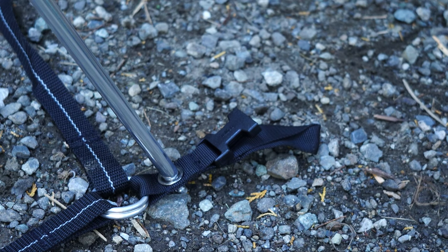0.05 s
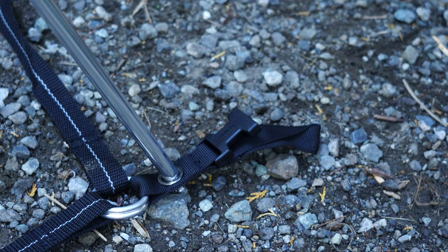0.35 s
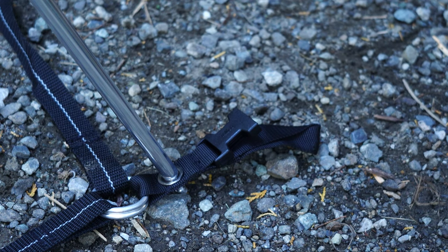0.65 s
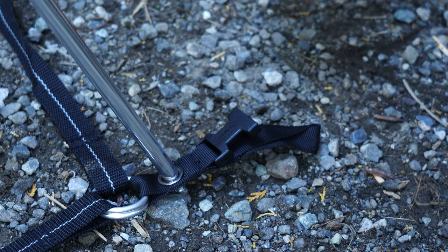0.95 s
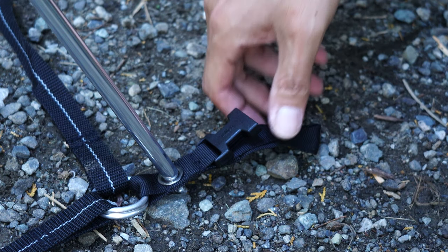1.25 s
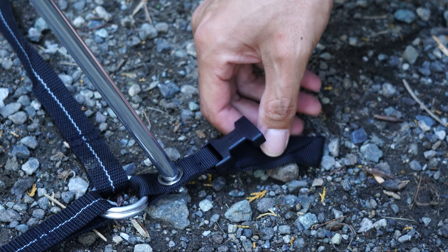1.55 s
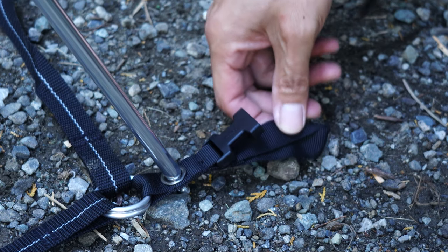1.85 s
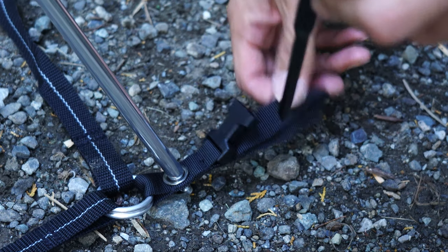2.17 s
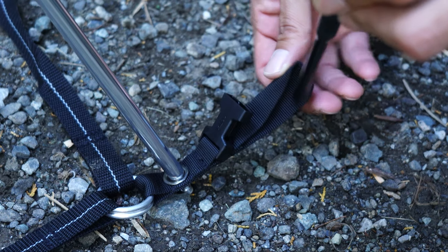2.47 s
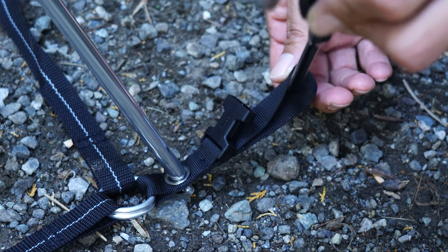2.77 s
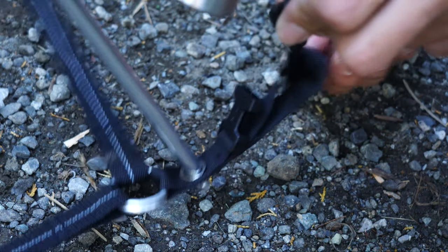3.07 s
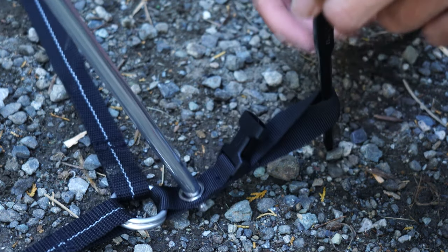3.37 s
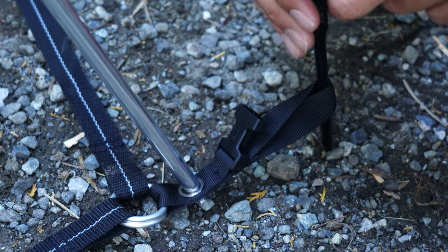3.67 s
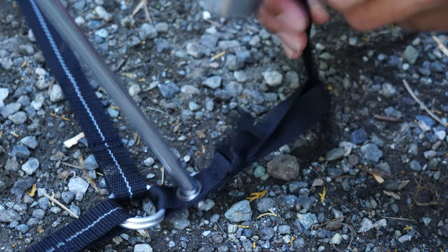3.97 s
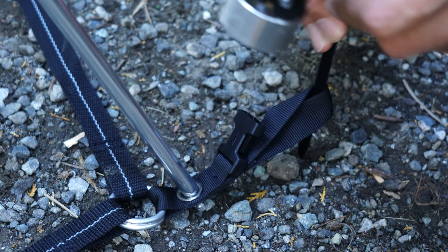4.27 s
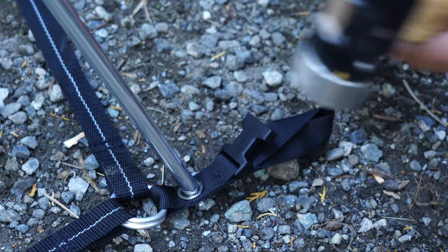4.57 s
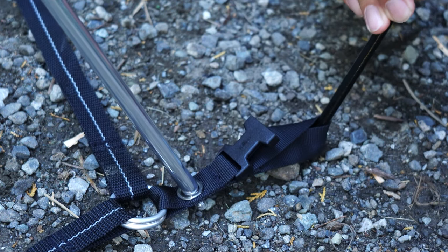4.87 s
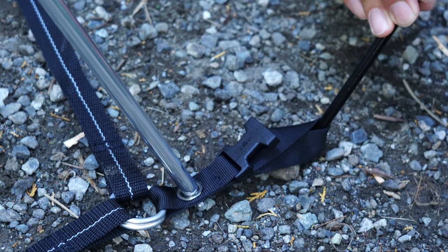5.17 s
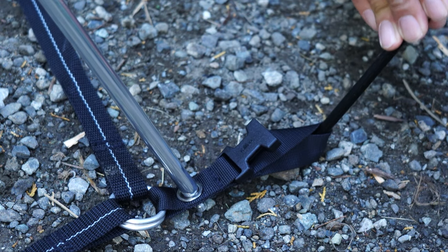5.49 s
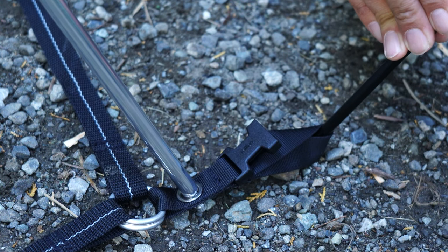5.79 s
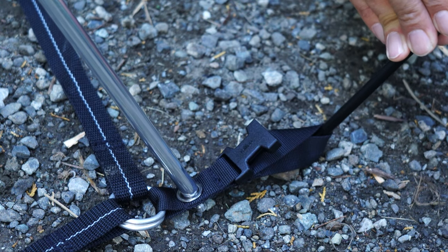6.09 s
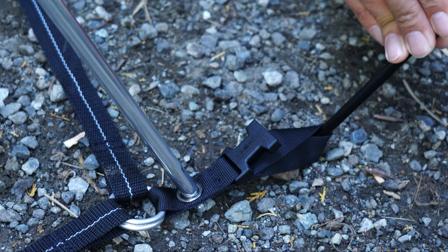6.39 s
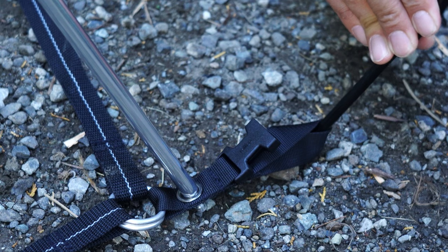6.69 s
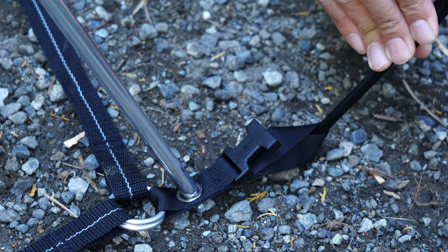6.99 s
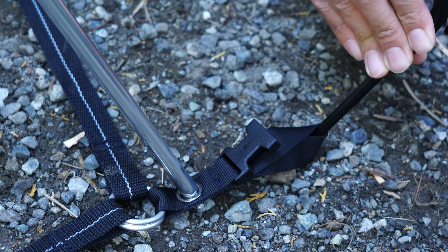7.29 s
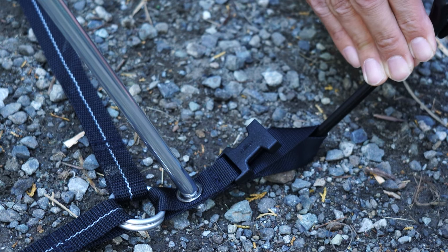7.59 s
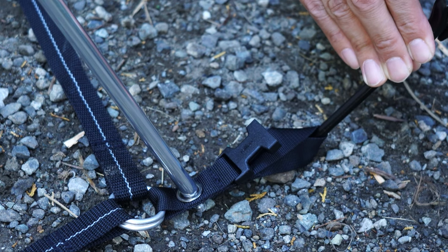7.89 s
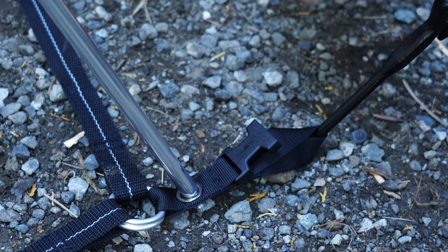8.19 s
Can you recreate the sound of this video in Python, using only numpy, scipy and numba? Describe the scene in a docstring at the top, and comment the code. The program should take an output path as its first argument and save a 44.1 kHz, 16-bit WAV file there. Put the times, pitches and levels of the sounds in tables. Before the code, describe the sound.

Close by at a quiet campsite, a shoe scuffs gravel and loose steel tent stakes slide together with a loud, ringing clank. Sleeves and nylon rustle softly, with small stone knocks, clicks of metal fittings and thin ticks from a tightening strap. After a short gravel crunch, a hammer strikes a stake about seven times, sharp and evenly spaced, with a light outdoor echo. A distant engine hums faintly throughout.

```python
"""A gravel campsite, close to a tent being pitched. Nylon and sleeves rub, loose steel stakes scrape
and ring in their free modes, a shoe grinds the stones, fittings click and webbing ticks by stick-slip
friction. Then a hammer drives a stake in, each impact exciting the modes of stake and hammer head.
The surroundings reflect the work, a far engine hums at its firing rate, and a limiter ducks the
loudest peaks."""
import sys
import numpy as np
from scipy import signal
from scipy.fft import rfft, irfft, next_fast_len
from scipy.io import wavfile
from scipy.ndimage import uniform_filter1d, minimum_filter1d
from numba import njit

SR = 44100
rng = np.random.default_rng(int(sys.argv[2]) if len(sys.argv) > 2 else 0)


def bounce(signal):
    """Save signal as a 16-bit WAV file at the path given by the first command-line argument."""
    frames = np.transpose(np.atleast_2d(signal))
    limited = np.clip(frames, -1, 1)
    pcm = np.round(limited * 32767).astype(np.int16)
    wavfile.write(sys.argv[1], SR, pcm)


N = 372644
TIME = np.arange(N) / SR


def undb(db):
    """Decibels to amplitude ratio."""
    return 10 ** (np.asarray(db) / 20)

def unit(x):
    """Normalisation to rms 1."""
    return x / np.sqrt(np.mean(x ** 2))

def fade(t, t60):
    """Exponential decay by 60 dB in t60 seconds."""
    return np.exp(-np.log(1000) * t / t60)

def mode(t, hz, t60, db):
    """Free vibration of one mode: a damped sinusoid."""
    return undb(db) * np.sin(2 * np.pi * hz * t) * fade(t, t60)

def add(out, s, x):
    """Superposition of x on out at time s, which may lie before the start."""
    i = int(s * SR)
    part = x[..., max(-i, 0):N - i]
    out[..., max(i, 0):max(i, 0) + part.shape[-1]] += part

def colour(x, points):
    """Spectral shaping by (frequency [Hz], gain [dB]) points, conserving the power of white noise."""
    hz, db = np.transpose(points)
    f = np.fft.rfftfreq(x.shape[-1], 1 / SR)
    gain = unit(undb(np.interp(np.log(f + 1), np.log(hz), db)))
    return irfft(rfft(x) * gain, x.shape[-1])

def noise(points):
    """Coloured Gaussian noise, rms near 1."""
    return colour(rng.standard_normal(next_fast_len(N)), points)[:N]

def resonance(x, hz, width):
    """Two-pole resonator, gain 1 at the centre."""
    return signal.lfilter(*signal.iirpeak(hz, hz / width, fs=SR), x)

def walk(rate):
    """Smooth random modulation, spread near 1."""
    k = int(SR / rate)
    return uniform_filter1d(np.repeat(rng.standard_normal(N // k + 1), k), k)[:N]

def grit(size, spread_db):
    """Dense micro-contacts of log-normal strength, rms 1."""
    return unit(rng.standard_normal(size) * undb(spread_db * rng.standard_normal(size)))

def sides(pan_db):
    """Constant-power panning; pan is the left level minus the right."""
    return unit(undb(np.array([[pan_db], [-pan_db]]) / 2))

def place(x, pan_db, scatter=0.44, size=200):
    """Multipath propagation: each channel gets the direct sound and scatter from hands and stones."""
    paths = rng.standard_normal((2, size)) * fade(TIME[:size], 0.032)
    paths *= scatter / np.linalg.norm(paths, axis=1, keepdims=True)
    paths[:, 0] = 1
    arrivals = signal.oaconvolve(x[None], paths, axes=1)[:, :len(x)]
    return arrivals * sides(pan_db) / np.hypot(1, scatter)


def friction(points, spread_db, pan_db, diffuse):
    """An extended rubbing surface radiates grainy noise, only partly coherent between the channels."""
    shared, left, right = (colour(grit(next_fast_len(N), spread_db), points)[:N] for _ in range(3))
    return (shared + diffuse * np.array([left, right])) * sides(pan_db) / np.hypot(1, diffuse)

def stroke(length, attack_share=0.37, release_share=0.22):
    """Amplitude envelope of a cloth movement: it speeds up, holds and dies away."""
    release = release_share * length
    t = TIME[:int((length + 6 * release) * SR)]
    rise = np.sin(np.pi / 2 * np.minimum(t / (attack_share * length), 1)) ** 2
    return rise * np.exp(-np.maximum(t - length, 0) / release)

# spectra of rubbing cloth and of hissing nylon weave: (frequency [Hz], gain [dB])
RUB_SPECTRUM = [(100, -34), (280, -5.5), (550, -0.5), (1200, -2.5), (2100, -1), (3500, -5.5), (6000, -13),
                (12000, -70)]
HISS_SPECTRUM = [(1000, -24), (3000, 0), (5000, -0.5), (8000, -0.5), (11000, -1), (15500, -0.5)]
# strokes of sleeves and nylon: (time [s], duration [s], relative rub [dB], relative hiss [dB])
CLOTH_STROKES = [(-0.2, 0.82, -36.5, -34.5), (0.615, 0.28, -35.5, -30), (0.924, 0.27, -41, -41),
                 (1.215, 0.15, -62, -44), (1.727, 0.37, -36, -35.5), (2.11, 0.21, -44, -43),
                 (2.404, 0.25, -42.5, -46), (2.857, 0.2, -49, -71), (3.015, .11, -60, -44),
                 (3.25, 0.21, -40.5, -37), (3.553, 0.11, -46.5, -42.5), (4.466, 0.17, -44, -41),
                 (4.592, 0.26, -34, -34), (4.899, 0.099, -43, -41), (5.013, 0.17, -38, -43.5),
                 (5.139, 0.04, -33.5, -33), (5.2, 0.23, -43, -38), (5.455, 0.17, -39.5, -43.5),
                 (5.743, 0.15, -45, -45), (6.66, 0.21, -50.5, -47), (7.981, 0.14, -38, -39.5),
                 (8.119, 0.13, -41, -38), (8.237, 0.11, -37, -33.5)]

def fabric(swing_s=0.074):
    """Friction noise: cloth murmurs and nylon hisses; incoherent strokes add in power."""
    # the sleeve swishes ahead of each hammer blow
    swings = [(blow[0] - swing_s, swing_s, -47.5, -46) for blow in HAMMER_BLOWS]
    power = undb([[-48], [-51]]) ** 2 * np.ones(N)  # rub and hiss: clothes never lie quite still
    for s, length, rub_db, hiss_db in CLOTH_STROKES + swings:
        add(power, s, (undb([[rub_db], [hiss_db]]) * stroke(length)) ** 2)
    rub_gain, hiss_gain = np.sqrt(power)
    catch_db = 0.63 * walk(70)
    rub = friction(RUB_SPECTRUM, spread_db=6.5, pan_db=-12, diffuse=0.39) * undb(catch_db + 1.01)
    hiss = friction(HISS_SPECTRUM, spread_db=6, pan_db=-8, diffuse=1) * undb(0.5 * catch_db + 1.5)
    # grit caught under the moving cloth ticks now and then
    crumbs = friction(RUB_SPECTRUM, spread_db=11.5, pan_db=-8.5, diffuse=0.3) * undb(-9)
    return (rub + crumbs) * rub_gain + hiss * hiss_gain


# hum of the far engine: (time [s], level [dB])
ENGINE_LEVEL = [(0.2, -39.5), (1.1, -54), (1.7, -42.5), (3.2, -43), (4.2, -37.5), (5.4, -43.5),
                (6.6, -39.5), (7.5, -45), (8.2, -43.5)]

def engine(firing_hz=128.8, sag_hz_per_s=0.27):
    """Periodic firing gives a slowly sagging tone and its subharmonic at half the rate."""
    db = np.interp(TIME, *np.transpose(ENGINE_LEVEL))
    phase = 2 * np.pi * np.cumsum(firing_hz - sag_hz_per_s * TIME + 1.39 * walk(9)) / SR
    firing = undb(db + 1.3 * walk(9)) * np.sin(phase)
    subharmonic = undb(db - 8 + 5.1 * walk(7)) * np.sin(phase / 2)
    return firing + subharmonic


# spectrum of the open air common to both channels: (frequency [Hz], gain [dB])
AIR_SPECTRUM = [(20, 0.5), (35, -8), (65, 0), (100, 2), (170, -3), (300, -6), (500, -11.5), (1000, -16),
                (2000, -22), (4000, -64), (7000, -41.5), (15500, -86)]

def open_air():
    """Ambient noise: the bass is coherent between the channels, the treble diffuse."""
    side_spectrum = [(30, -14), (150, 0.5), (400, -4), (1500, 0), (4000, -4), (8000, -5), (15500, -4)]
    side = undb(-48) * noise(side_spectrum)
    mid = undb(-45 + 1.6 * walk(3.7)) * noise(AIR_SPECTRUM)
    return mid + np.array([side, -side])


# closely paired modes of free steel stakes: (frequency [Hz], relative level [dB])
FREE_MODES = [(5211, -32.5), (6035, -38), (6718, -46), (7440, -37), (7510, -33.5), (8301, -33),
              (10864, -35), (10987, -31), (11127, -29), (12845, -38), (13679, -39), (13733, -33),
              (13797, -34), (15165, -34), (15246, -40), (15299, -38)]
# their lowest bending modes, damped by the hand: (frequency [Hz], bandwidth [Hz], gain [dB])
DAMPED_BENDS = [(960, 110, -8), (2980, 160, -7)]
# stake sliding on stake: (time [s], duration [s], drive level [dB], favoured frequency [Hz])
STAKE_SLIDES = [(0.0, 0.0073, -26.5, 6000), (0.64, 0.017, -15.5, 10700), (0.662, 0.043, 3, 8000),
                (0.688, 0.045, 4.5, 14200), (0.729, 0.043, 4, 5460), (0.779, 0.026, 2.5, 8200),
                (0.806, 0.03, 0.5, 10540), (0.837, 0.025, -4.5, 8400), (0.862, 0.027, -19, 5740),
                (3.808, 0.065, -43.5, 6850), (4.015, 0.0096, -39.5, 13000), (4.17, 0.095, -50.5, 6035)]

def loose_stakes(mid_t60_s=0.1, flutter_db=3, flutter_per_s=180):
    """Forced vibration: sliding contact feeds the rods' modes, favouring some as the contact moves."""
    drive = np.zeros(N)
    for s, length, db, hz in STAKE_SLIDES:
        contact = grit(int(length * SR), 16.2)
        add(drive, s, undb(db) * unit(contact + undb(9) * resonance(contact, hz, 400)))
    mode_hz, mode_db = np.transpose(FREE_MODES)
    # low modes ring longest
    widths = np.log(1000) / (np.pi * mid_t60_s) * np.sqrt(mode_hz / mode_hz.mean())
    shares = undb(mode_db) / np.linalg.norm(undb(mode_db))
    ring = np.zeros((2, N))
    for hz, width, share in zip(mode_hz, widths, shares):
        flutter = undb(flutter_db * walk(flutter_per_s))  # the contact chatters
        pan_db = -2.8 + 2 * rng.standard_normal()
        ring += share * unit(resonance(drive, hz, width) * flutter) * sides(pan_db)
    bends = sum(undb(db) * resonance(drive, hz, width) for hz, width, db in DAMPED_BENDS)
    return np.std(drive) * ring + place(bends + undb(-24.5) * drive, pan_db=-1.2)


# leaves and stones reflect the treble best: (frequency [Hz], gain [dB])
SCATTER_SPECTRUM = [(500, -18.5), (2800, 4), (4500, 4), (8000, -1.5), (11300, 0.5), (13000, -1),
                    (15500, -7)]

def surroundings(x, slap_delay_s=0.0465, t60_s=0.62, size=40000):
    """Reflection: one nearby slap echo within thin scattering from the ground and trees."""
    t = TIME[:size]
    trees = colour(rng.standard_normal((2, size)), SCATTER_SPECTRUM)
    trees *= fade(t, t60_s) * (1 - fade(t, 0.017))
    response = undb(-25) * trees / np.linalg.norm(trees[0])
    slap = rng.standard_normal((2, size // 20)) * fade(t[:size // 20], 0.03)
    add(response, slap_delay_s, undb(-25.5) * slap / np.linalg.norm(slap[0]))
    return signal.oaconvolve(x[None], response, axes=1)[:, :N]


def stone_ring(impacts, hz, hollow_db):
    """Impacts excite a broad resonance of the stones and a narrow one of a hollow; energy 1."""
    burst = resonance(resonance(impacts, hz, 1.22 * hz), hz, 1.9 * hz)
    burst += undb(hollow_db) * resonance(burst, hz=1190, width=174)
    return burst / np.linalg.norm(burst)

# a shoe grinding gravel: (time [s], duration [s], level [dB], centre [Hz], thud level [dB], pan [dB])
SHOE_SCUFFS = [(0.071, .022, -29.5, 1210, -28.5, -13), (0.302, 0.27, -39.5, 1780, -41.5, -26),
               (0.456, 0.17, -42, 1200, -40.5, -10), (0.912, 0.075, -35, 1830, -71, -2),
               (1.135, 0.11, -49, 1390, -56, -1), (4.717, 0.0265, -21.5, 1160, -30, -8),
               (4.747, 0.053, -25.5, 1920, -36.5, -11), (4.788, 0.047, -22.5, 2220, -35, -5)]

def shoe(edge_s=0.0013, clumps_per_s=260, clump_db=4.5, thud_hz=269, thud_width_hz=630, tail=600):
    """Granular friction: stones give way in random clumps under the sole, which thuds dully."""
    out = np.zeros((2, N))
    clumps = undb(clump_db * walk(clumps_per_s))
    for s, length, db, hz, thud_db, pan_db in SHOE_SCUFFS:
        n = int(length * SR)
        edges = np.minimum(np.minimum(TIME[:n], length - TIME[:n]) / edge_s, 1)
        load = edges * clumps[int(s * SR):][:n]
        impacts, push = (np.pad(grit(n, spread_db=6) * load, (0, tail)) for _ in range(2))
        impacts += undb(-3.5) * resonance(impacts, hz=2070, width=260)  # squeezed grit scrapes
        crunch = stone_ring(impacts, hz, hollow_db=2.5)
        thud = resonance(resonance(push, thud_hz, thud_width_hz), thud_hz, thud_width_hz)
        add(out, s, place(undb(db) * np.sqrt(n) * crunch, pan_db))
        add(out, s, undb(thud_db) * np.sqrt(n) * thud / np.linalg.norm(thud))
    return out


# single stones knocking: (time [s], duration [s], level [dB], centre [Hz], pan [dB])
STONE_KNOCKS = [(0.082, 0.0027, -16.5, 1600, -29), (0.15, 0.0046, -25.5, 3000, -9),
                (0.453, 0.0042, -23.5, 1590, -26), (0.474, 0.017, -29.5, 3430, -7),
                (0.517, 0.0027, -26.5, 1990, -16), (0.633, 0.025, -24.5, 1030, -5),
                (0.803, 0.037, -14, 3030, -1), (0.839, 0.004, -8, 2580, -1), (1.2, 0.0026, -23.5, 2220, -9),
                (1.531, 0.0034, -34.5, 1510, -14), (1.589, 0.0013, -28, 5000, -9),
                (1.608, .0043, -34.5, 1510, -9), (2.211, 0.0024, -30.5, 2000, -22),
                (2.354, 0.0017, -26, 1500, -15), (2.4604, 0.00145, -25.5, 1840, -25),
                (2.514, 0.0021, -27, 1880, -26), (4.64, .0034, -26, 4000, -25),
                (4.7105, 0.0027, -16.5, 2030, -24), (4.8178, 0.00083, -9, 2470, -24),
                (5.163, 0.0083, -27.5, 3020, -27), (5.189, 0.0032, -26.5, 2000, -23),
                (5.276, .004, -30, 2000, -24), (5.516, 0.0054, -31.5, 1160, -17)]

def stones(tail=400):
    """Impact excitation: a lone stone knocks in a brief burst of contacts, hardly ringing the hollow."""
    out = np.zeros((2, N))
    for s, length, db, hz, pan_db in STONE_KNOCKS:
        n = int(length * SR)
        impacts = grit(n, spread_db=4.5) * fade(TIME[:n], t60=3.2 * length)
        knock = stone_ring(np.pad(impacts, (0, tail)), hz, hollow_db=-3)
        add(out, s, place(undb(db) * np.sqrt(n) * knock, pan_db))
    return out


# soft bumps on the ground: (time [s], duration [s], frequency [Hz], level [dB])
GROUND_BUMPS = [(0.332, 0.077, 36.7, -24), (0.524, .08, 43.5, -37), (1.385, 0.022, 72, -24),
                (7.395, 0.11, 34.2, -39), (7.906, .13, 28, -36)]

def bumps():
    """Low-frequency transients: weight settles on the ground in a few slow oscillations."""
    out = np.zeros(N)
    for s, length, hz, db in GROUND_BUMPS:
        n = int(length * SR)
        add(out, s, undb(db) * np.hanning(n) * np.sin(2 * np.pi * hz * TIME[:n]))
    return out


# damped modes of a stake held by the ground: (frequency [Hz], bandwidth [Hz], gain [dB])
HELD_MODES = [(1720, 115, -2.5), (3940, 900, -1.5), (5180, 440, 3.5), (6450, 1400, 1.5), (8270, 1060, 0),
              (11300, 530, 2), (13070, 760, 13)]

def crack(t60, bright_hz, size=1500):
    """Contact chatter of steel on steel excites the stake's damped modes; rms 1 over the first 2 ms."""
    contact = rng.standard_normal(size) * fade(TIME[:size], t60)
    click = undb(-14) * (0.015 / t60) ** 2 * contact  # a short, square blow is more click than body
    body = sum(undb(db) * resonance(contact, hz, width) for hz, width, db in HELD_MODES)
    burst = signal.sosfilt(signal.butter(2, bright_hz, fs=SR, output="sos"), click + body)
    return burst / np.std(burst[:SR // 500])

# metal fittings clicking: (time [s], level [dB], pan [dB])
FITTING_CLICKS = [(0.6431, -2, -2), (0.647, -11, -3), (0.8454, -5, -2), (3.177, -34.5, -2),
                  (3.3381, -13.5, 11), (3.341, -14.5, -4), (3.402, -25.5, 3), (3.494, -39, 2),
                  (3.829, -36, -8), (3.849, -28.5, -4), (4.029, -34.5, -4), (5.131, -19, -13),
                  (5.331, -22, -17), (5.335, -28, -18)]
# filter that shapes each click: (frequency [Hz], gain [dB])
FITTING_FILTER = [(500, 11), (4000, -2.5), (9000, 10), (13000, 2)]

def fittings():
    """Heavily damped impacts: pole end, ring and stake knock together in short dead clicks."""
    out = np.zeros((2, N))
    for s, db, pan_db in FITTING_CLICKS:
        snap = colour(crack(t60=0.013, bright_hz=15400), FITTING_FILTER)
        add(out, s, place(undb(db) * snap, pan_db, scatter=0.19))
    return out


# runs of jerks in taut webbing:
# (time [s], duration [s], first rate [1/s], last rate [1/s], relative level [dB])
WEBBING_SLIPS = [(0.951, .13, 60, 56, -27), (4.133, .1, 17.5, 34, -24.5), (4.262, .21, 31, 28, -22.5),
                 (4.490, .19, 42, 130, -21.5), (5.368, .075, 38, 24, -19), (6.184, .14, 16, 15.7, -28.5)]
# spectrum of one jerk: (frequency [Hz], gain [dB])
TICK_SPECTRUM = [(500, -30), (3500, -8), (5200, -0.5), (8000, -15.5), (10500, -10), (12500, 1.5),
                 (15500, 9)]

def webbing(tick_t60_s=0.002, gain_db=11, spread_db=4.5, size=512):
    """Stick-slip friction: the strap jerks faster as it is pulled harder, each jerk a thin tick."""
    out = np.zeros((2, N))
    for s, length, first_rate, last_rate, db in WEBBING_SLIPS:
        t = 0
        while t < length:
            jerk = rng.standard_normal(size) * fade(TIME[:size], tick_t60_s)
            tick = colour(np.roll(jerk, size // 16), TICK_SPECTRUM)
            peak = undb(db + gain_db - spread_db * rng.standard_normal())
            add(out, s + t, place(peak * tick / np.abs(tick).max(), pan_db=-17, scatter=0.51))
            t += 1 / np.interp(t, [0, length], [first_rate, last_rate])
    return out


# blows on the stake: (time [s], crack level [dB], chatter t60 [s], low-pass cutoff [Hz],
# ground knock [dB], stake bend [dB], low head tone [dB], high head tone [dB], echo send [dB], pan [dB]);
# knock, bend, tones and send are relative to the crack
HAMMER_BLOWS = [(5.6381, -2.5, 0.021, 8600, -20, 2, -6, -30, -23, -6),
                (6.0399, 5, 0.01, 11800, -25, -2, -9.5, -46, -2.5, -10.5),
                (6.4668, 6.5, 0.016, 11700, -7, 0, -20, -48, -2, -8),
                (6.8358, 6, 0.0078, 14700, -24, -7.5, -25, -19, 4.5, -3.5),
                (7.1797, 7, 0.0061, 13700, -28, -4.5, -23, -27, 3, -1),
                (7.4630, -6, 0.015, 4600, -8, 8.5, -24, -50, 7, -11),
                (7.486, 6.5, 0.0081, 11300, -9, -6, -28, -27, 1, -4.5),
                (7.8707, -6.5, 0.016, 7700, 4.5, 10, -15.5, -14, -7, -5)]
# faint after-ring of the driven stake: (frequency [Hz], t60 [s], level relative to the crack [dB])
AFTER_RING = [(2800, 0.29, -40.5), (4400, 0.5, -54), (5320, 0.55, -51.5), (11000, 0.2, -38),
              (12950, 0.19, -36)]

def hammer(bend_hz=2690, knock_hz=1760, size=16000):
    """Impact excites the modes of stake and hammer head. Returns the direct and the outgoing sound."""
    direct, outgoing, t = np.zeros((2, N)), np.zeros(N), TIME[:size]
    for s, db, chatter_s, bright_hz, knock_db, bend_db, low_db, high_db, send_db, pan_db in HAMMER_BLOWS:
        # the ground grips the stake differently at each blow, detuning its modes
        bend_grip = 1 + 0.012 * rng.standard_normal()
        bend = mode(t, bend_hz * bend_grip, t60=0.019, db=bend_db)
        knock = mode(t, knock_hz, t60=0.015, db=knock_db)
        swell = 1 - fade(t, 0.0066)
        blow = (bend + knock) * swell
        add(blow, 0, crack(chatter_s, bright_hz))
        ring_grip = 1 + 0.0122 * rng.standard_normal()
        stake = sum(mode(t, hz * ring_grip, t60, ring_db) for hz, t60, ring_db in AFTER_RING)
        head = mode(t, hz=7262, t60=0.125, db=low_db) + mode(t, hz=8608, t60=0.16, db=high_db)
        add(direct, s, undb(db) * (place(blow, pan_db, scatter=0.54) + (head + stake) * sides(-13)))
        add(outgoing, s, undb(db + send_db) * blow)
    return direct, outgoing


def ports(x, lag_s=1e-5):
    """Path difference: the left microphone port is further from the work and hears it later."""
    size = next_fast_len(N)
    delay = np.exp(-2j * np.pi * np.fft.rfftfreq(size, 1 / SR) * lag_s)
    return np.array([irfft(rfft(x[0], size) * delay, size)[:N], x[1]])

def scene(handling_send_db=-6):
    """Superposition of the work, its reflections, the cloth and the quiet campsite."""
    blows, outgoing = hammer()
    handling = loose_stakes() + stones() + shoe() + fittings() + webbing()
    echoes = surroundings(outgoing + undb(handling_send_db) * handling.mean(axis=0))
    return ports(blows + handling + echoes + fabric() + bumps() + engine() + open_air())


@njit
def follow(peak, release):
    """Peak detection with instant attack and exponential release."""
    out, envelope = np.empty(len(peak)), 0.
    for i in range(len(peak)):
        envelope = max(peak[i], envelope * release)
        out[i] = envelope
    return out

def record(dry, ceiling_db=-4, release_s=0.031, top_hz=15750, window=25):
    """Look-ahead limiting flattens the hits and lets the background swell back; the top is cut."""
    ceiling = undb(ceiling_db)
    envelope = follow(np.abs(dry).max(axis=0), np.exp(-1 / (release_s * SR)))
    needed_gain = ceiling / np.maximum(envelope, ceiling)
    gain = uniform_filter1d(minimum_filter1d(needed_gain, window), window)
    return signal.sosfilt(signal.ellip(10, 0.2, 70, top_hz, fs=SR, output="sos"), dry * gain)


dry = scene()
out = record(dry)
bounce(out)
```